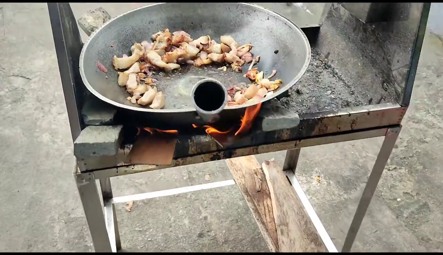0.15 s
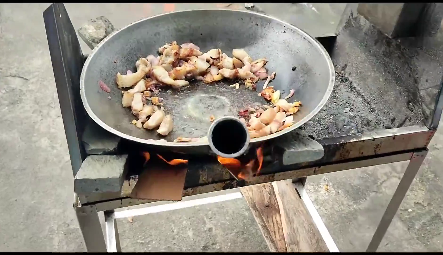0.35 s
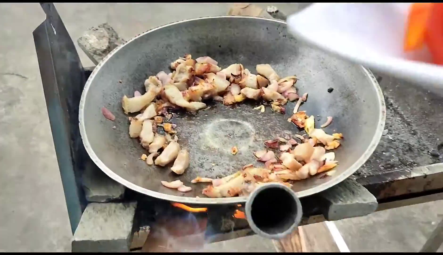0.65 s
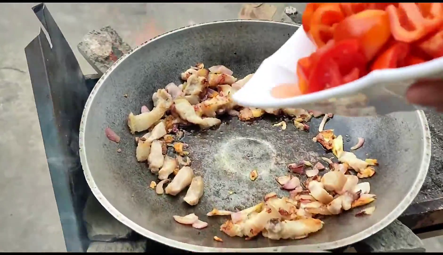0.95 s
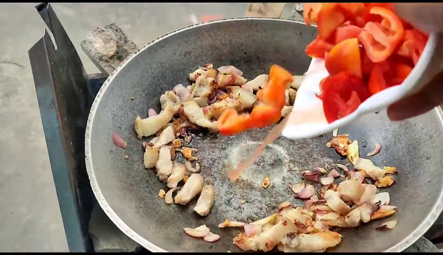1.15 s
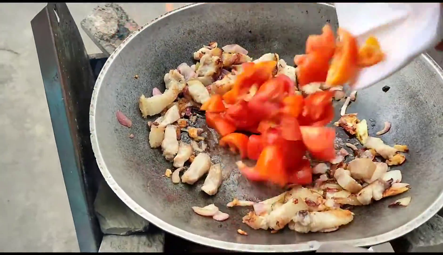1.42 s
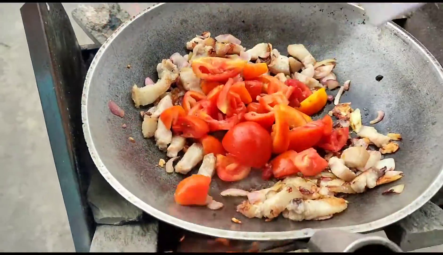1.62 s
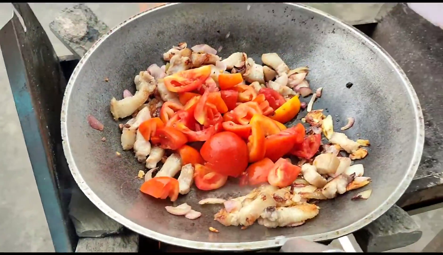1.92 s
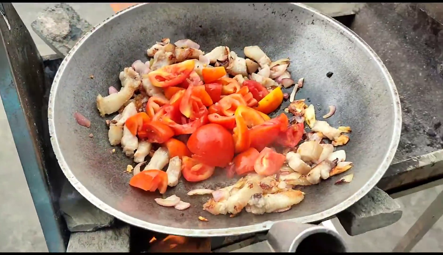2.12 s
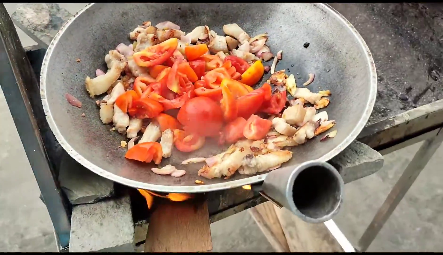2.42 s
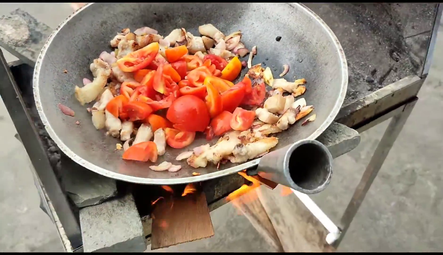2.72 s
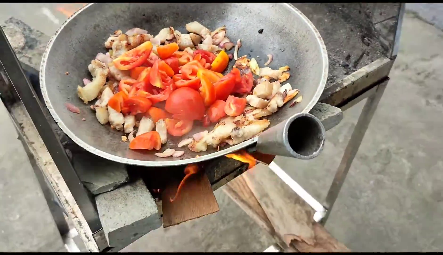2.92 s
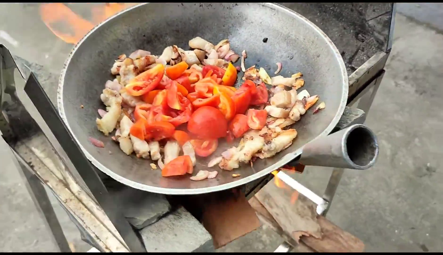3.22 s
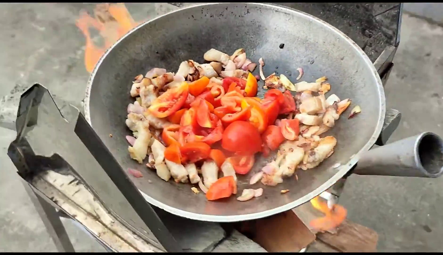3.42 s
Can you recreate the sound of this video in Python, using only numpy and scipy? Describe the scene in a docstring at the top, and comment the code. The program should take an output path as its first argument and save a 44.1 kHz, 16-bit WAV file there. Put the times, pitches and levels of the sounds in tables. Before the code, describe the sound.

Meat fries in a steel wok over a low fire outdoors, with sparse sizzle, sharp spits and small knocks; tomatoes thud in and a dense loud hiss takes over, close stereo microphone.

```python
"""Pork sizzles in a steel wok outdoors: filtered bubble bursts and steam noise, with single bubbles snapping above.
Fat spits (short noise squirts) and pops (cracks with a spray); a wood fire rumbles as shaped noise.
Tomatoes thud in, ring the wok's modes and swell the hiss; knocks and soft low bumps are heard nearby.
Flicks push on the right microphone port and a low two-tone hum swells near the end.
The camera's limiter ducks peaks above full scale and recovers slowly."""
import sys
import numpy as np
from scipy import signal
from scipy.fft import rfft, irfft, next_fast_len
from scipy.io import wavfile
from scipy.ndimage import uniform_filter1d, minimum_filter1d, map_coordinates

SR = 44100
rng = np.random.default_rng(int(sys.argv[2]) if len(sys.argv) > 2 else 0)


def output_pcm(signal):
    """Save a mono or channel-first signal as 16-bit PCM at the path in sys.argv[1].

    Samples are clipped to [-1, 1] before scaling.
    """
    pcm = np.clip(np.atleast_2d(signal).T, -1, 1) * 32767
    wavfile.write(sys.argv[1], SR, np.round(pcm).astype(np.int16))


N = 156555

# Frying strength. Each row: time in seconds, level in dB, right-over-left lean in dB added to the colour's own.
FRYING_LEVELS = [(0, -31, 3), (.35, -28, 3.5), (.6, -30.5, 2.5), (.85, -28.5, 4.5), (1.05, -33.5, 0.5),
                 (1.28, -28, -1.5), (1.3, -21, -4.5), (1.36, -13, 6.5), (1.47, -14.5, -2.5),
                 (1.53, -9, -0.5), (1.6, -11, -2), (1.79, -14.5, -3), (1.86, -7.5, -1), (1.92, -12, 1),
                 (2.12, -10, -1), (2.23, -12.5, 3.5), (2.32, -12, 0.5), (2.42, -14.5, 3.5), (2.48, -8, 3.5),
                 (2.52, -15, 5.5), (2.57, -10, -2), (2.72, -16.5, 3), (3.2, -14.5, 1.5), (3.55, -15.5, 1.5)]
# Frying colour at the ports. Each row: frequency in Hz, left gain in dB, right gain in dB.
SIZZLE_COLOUR = [(100, -21.5, -26), (300, -29.5, -31), (454, -33, -37), (597, -14, -18), (780, -20, -23),
                 (1520, -12.5, -18), (3240, -7.5, -9), (4520, -9.5, -6), (6040, -9, -2), (7200, -4, 2),
                 (7816, -10, 1), (8190, -4.5, -13.5), (9300, -8, -10.5), (9700, -16, -9),
                 (13150, -8.5, -11.5), (15200, -11.5, -16.5)]
# Fat alone against wet frying. Each row: frequency in Hz, gain in dB.
FAT_COLOUR = [(700, 0.5), (2200, -2), (6000, -1), (8500, -0.5), (13000, 0)]
# Likeness of the ports. Each row: frequency in Hz, left-right correlation (0 to 1).
PORT_LIKENESS = [(60, 0.82), (150, 0.99), (400, 0.76), (1000, 0.8), (2400, 0.57), (6000, 0.014)]
JUICE_S = 1.3  # the tomatoes reach the hot steel
BUBBLES_PER_S, BUBBLE_SPREAD_DB, STEAM_DB = 2600, 4, 0.5
# Fat alone bursts less often, and its level swings are a little gentler
FAT_BUBBLE_SHARE, FAT_SWING_SHARE = 0.3, 0.81
FLURRY_DB, FLUTTER_DB, SWELL_DB = 0.32, 1.5, 0.8  # fast, medium and slow level swings in wet frying

# Single bubbles, oil then juice. Each row: start in seconds, end in seconds, count per second,
# top level in dB over the frying, middle pitch in Hz, cycles to decay to 1/e.
BUBBLE_TICKS = [(0, JUICE_S, 120, 20, 6900, 2.2), (JUICE_S, 3.54, 380, 12.1, 6350, 3.6)]
TICK_RANGE_DB, TICK_LEFT_DB, TICK_SPREAD_OCT = 16, -4, 0.6

# Flames and yard. Each row: time in seconds, level in dB.
FIRE_LEVELS = [(0, -34), (.25, -30.5), (.5, -34), (.8, -34), (1.3, -36), (1.7, -37), (2.4, -36), (3.0, -37),
               (3.17, -29), (3.55, -31.5)]
# Rumble colour. Each row: frequency in Hz, gain in dB.
RUMBLE_COLOUR = [(20, -1.5), (45, -2), (70, 4.5), (100, -2.5), (145, 3), (200, -12), (320, -8),
                 (480, -15.5), (1000, -21.5), (3000, -36)]

# Steam squirts from the fat. Each row: start in seconds, level in dB before colouring, decay to 1/e in seconds.
FAT_SPITS = [(0.033, -6, 0.0043), (0.04, -6.5, 0.0017), (0.151, -11, 0.0017), (.241, -15, 0.0014),
             (0.159, -15, 0.0009), (0.306, -14, .0015), (0.429, -7, 0.00093), (0.435, -14, 0.0043),
             (0.5124, -2, 0.0016), (0.615, -11, 0.00091), (0.624, -10, .002), (.629, -3, 0.0029),
             (0.6896, -3.5, 0.0015), (0.754, -12, .004), (0.766, -13, 0.0048), (0.781, -7, 0.0016),
             (.893, -14, .0015), (1.154, -8, 0.0018), (1.194, -11, 0.0031), (1.295, -8.5, 0.0043),
             (1.328, 1.5, 0.0042), (2.122, -6, 0.0035), (2.2, -16, 0.0015)]
SPIT_HZ, SPIT_WIDTH_HZ, SPIT_RING_GAIN = 8200, 2900, 2.76
SPIT_LEFT_DB, SPIT_ATTACK_S = -4.5, 0.00038
STRAY_SPITS_PER_S, STRAY_SPIT_DB = 16, -5  # top level over the frying

# Knocks nearby. Each row: start in seconds, level in dB, brightness in dB per octave.
KNOCK_BLOWS = [(.086, -34.5, 7), (.3415, -22, 0), (.351, -29, 6), (.367, -32, 0), (.401, -28, -8),
               (.526, -30, -4)]
# Modes of the knocked object. Each row: frequency in Hz, level in dB, 60 dB decay in seconds.
KNOCK_MODES = [(730, 5.5, 0.057), (833, -2.5, 0.047), (970, -0.5, 0.06), (1085, 0, 0.068), (1380, -8, 0.06)]
# Line width added by loose, rattling contact
WOK_BLUR_HZ, KNOCK_BLUR_HZ = 2.6, 22

# Soft low bumps of air. Each row: centre in seconds, level in dB, pitch in Hz, half-width to 1/e in seconds.
AIR_BUMPS = [(0.462, -24.5, 93, 0.014), (1.374, -24, 65, 0.014), (2.672, -20.5, 165, 0.0069)]

# Water drops bursting in the fat. Each row: start in seconds, relative level in dB.
WATER_POPS = [(0.489, 13), (0.5543, 0), (0.7521, -4), (.863, 6.5), (.865, 4), (.9969, 7.5), (1.1771, 4),
              (1.3981, 14.5), (1.474, 8.5), (2.4275, -2), (2.5665, 5.5)]
# Pop colour. Each row: frequency in Hz, gain in dB.
POP_SPECTRUM = [(150, -9), (700, -8), (2500, -7.5), (5500, 0.5), (7500, 2.5), (9500, -3), (14000, -3)]
POP_TAIL_DB, POP_TAIL_T60_S = -14, 0.013
POP_LAG_S = 0.00004  # a pop reaches the right port a little later

# Tomato pieces landing. Each row: start in seconds, level in dB, brightness in dB per octave.
TOMATO_LANDINGS = [(1.304, -21.5, 3), (1.322, -22.5, -5), (1.3326, -15.5, -2), (1.363, -35, -1),
                   (1.473, -21, -1.5), (1.501, -25, -8)]
# Modes of the loaded wok. Each row: frequency in Hz, level in dB, 60 dB decay in seconds.
WOK_MODES = [(215, -13, 0.11), (325, -7.5, 0.083), (460, -0.5, 0.035), (565, -2, 0.08), (643, -1, 0.048),
             (1259.6, 0, 0.15), (1630, -1.5, 0.064), (1940, -15, 0.1)]
THUD_T60_S, THUD_HZ = 0.043, 600
YARD_DB, YARD_T60_S = -11.5, 0.48

# Flicks on the right port. Each row: start in seconds, pressure step re full scale before smoothing,
# step decay to 1/e in seconds, tick re full scale. All before the limiter.
PORT_FLICKS = [(2.5816, -2.1, 0.029, 5.5), (2.667, 0.52, 0.01, 0), (2.689, 0.29, 0.017, 0.5)]
FLICK_HZ, FLICK_RING_HZ, FLICK_TICK_T60_S = 220, 620, 0.002
PUFF_S, PUFF_WIDTH_S, PUFF_DB = 2.75, 0.12, -8  # slow push of air on that port

# Hum strength. Each row: time in seconds, level in dB.
HUM_LEVELS = [(0, -56), (2.85, -51.5), (3.08, -37), (3.2, -36), (3.55, -33)]
HUM_HZ, OCTAVE_DB, HUM_WAVER = 156.5, -8.5, 0.0498  # waver as a fraction of pitch

TOP_HZ = 14350
CEILING_DB, RELEASE_DB_PER_S, HOLD_S = 0, 119, 0.005


def amp(db):
    """dB to amplitude factor."""
    return 10 ** (np.asarray(db) / 20)


def unit(x):
    """Scale to an RMS of 1 over all samples and ports."""
    return x / np.sqrt(np.mean(x ** 2) + 1e-20)


def along(points, hz):
    """Columns of (Hz, value, ..) points on a log axis."""
    f, *cols = np.transpose(points)
    return np.array([np.interp(np.log(hz + 1), np.log(f + 1), c) for c in cols])


def curves(rows):
    """One value per sample for each column after the time."""
    s, *cols = np.transpose(rows)
    return [np.interp(np.arange(N) / SR, s, c) for c in cols]


def wobble(rate):
    """Smooth random curve, rate knots per second."""
    knots = rng.standard_normal(int(N * rate / SR) + 4)
    return map_coordinates(knots, [np.arange(N) * rate / SR])


def filtered(x, response):
    """Apply a response given as a function of Hz."""
    m = 2 * next_fast_len(N // 2 + SR // 4)
    return irfft(rfft(x, m) * response(np.fft.rfftfreq(m, 1 / SR)), m)[..., :N]


def causal(gain):
    """Minimum-phase response with this gain, by folding the cepstrum."""
    c = irfft(np.log(gain + 1e-6))
    half = c.shape[-1] // 2
    c[..., 1:half] *= 2
    c[..., half + 1:] = 0
    return np.exp(rfft(c))


def add(track, s, sound):
    """Mix a sound in at time s."""
    part = track[..., max(round(s * SR), 0):][..., :sound.shape[-1]]
    part += sound[..., :part.shape[-1]]


def spread(pair):
    """Two unrelated signals become left and right: alike in the bass, unrelated in the treble."""
    def mid_side(hz):
        turn = np.arccos(np.clip(along(PORT_LIKENESS, hz)[0], -1, 1)) / 2
        return np.array([np.cos(turn), np.sin(turn)])

    mid, side = filtered(pair, mid_side)
    return np.array([mid + side, mid - side])


def sizzle():
    """Tiny bubbles burst in flurries over a bed of steam; juice makes them denser and recolours them."""
    level_db, lean_db = curves(FRYING_LEVELS)
    dry = np.arange(N) / SR < JUICE_S
    share = np.where(dry, FAT_BUBBLE_SHARE, 1)
    happens = rng.random((2, N)) < share * BUBBLES_PER_S / SR
    bursts = happens * rng.choice([-1, 1], (2, N)) / np.sqrt(share)
    size_db = BUBBLE_SPREAD_DB * np.minimum(rng.standard_normal((2, N)), 2.8)
    bubbles = unit(bursts * amp(size_db))
    source = spread(bubbles + amp(STEAM_DB) * rng.standard_normal((2, N)))

    flutter = np.array([wobble(50), wobble(50)])
    swings = amp(FLURRY_DB * wobble(320) + FLUTTER_DB * flutter + SWELL_DB * wobble(16))
    source = source * swings ** np.where(dry, FAT_SWING_SHARE, 1)
    wet = filtered(source, lambda hz: causal(amp(along(SIZZLE_COLOUR, hz))))
    fat = filtered(wet, lambda hz: amp(along(FAT_COLOUR, hz)))
    return np.where(dry, unit(fat), unit(wet)) * amp(level_db + np.outer([-.5, .5], lean_db))


def ticks():
    """Single bubbles snap as decaying sines, each with its own pitch; juice ones are denser and ring longer."""
    level_db, _ = curves(FRYING_LEVELS)
    out, t = np.zeros((2, N)), np.arange(SR // 125) / SR
    for start, end, rate, db, middle_hz, cycles in BUBBLE_TICKS:
        for when, size, a, b, phase in rng.random((int(rate * (end - start)), 5)):
            s = start + when * (end - start)
            hz = middle_hz * 2 ** (TICK_SPREAD_OCT * (a - b))
            turns = hz * t + np.array([[0], [phase]])
            snap = np.exp(-t * hz / cycles) * np.sin(2 * np.pi * turns)
            frying_db = level_db[min(int(s * SR), N - 1)]
            add(out, s, amp(frying_db + db - TICK_RANGE_DB * np.sqrt(size)) * snap)
    return out * amp([[TICK_LEFT_DB], [0]])


def fire():
    """Low, unsteady rumble of the flames and the yard: shaped noise."""
    noise = spread(rng.standard_normal((2, N)))
    roar = unit(filtered(noise, lambda hz: amp(along(RUMBLE_COLOUR, hz))))
    return roar * amp(curves(FIRE_LEVELS)[0] + 2.3 * wobble(9.8))


def spits():
    """Noise squirts with a resonant whistle; stray ones are louder where the frying is louder."""
    level_db, _ = curves(FRYING_LEVELS)
    strays = []
    for when, drop, length in rng.random((int(STRAY_SPITS_PER_S * N / SR), 3)):
        db = level_db[int(when * N)] + STRAY_SPIT_DB - 8 * drop
        strays.append((when * N / SR, db, .001 + 0.0039 * length))

    out, t = np.zeros((2, N)), np.arange(SR // 25) / SR
    for s, db, length in FAT_SPITS + strays:
        squirt = (1 - np.exp(-t / SPIT_ATTACK_S)) * np.exp(-t / length)
        add(out, s, amp(db) * squirt * rng.standard_normal((2, len(t))))

    def colour(hz):
        whistle = 1 + SPIT_RING_GAIN / (1 + (2 * (hz - SPIT_HZ) / SPIT_WIDTH_HZ) ** 2)
        return causal(amp(along(SIZZLE_COLOUR, hz)) * whistle)

    return filtered(out, colour) * amp([[SPIT_LEFT_DB], [0]])


def struck(blows, modes, blur_hz):
    """Each blow rings decaying modes, tilted by its brightness; loose contact jitters their phase."""
    out, t = np.zeros((2, N)), np.arange(SR // 3) / SR
    middle_hz = np.median([hz for hz, _, _ in modes])
    attack = 1 - np.exp(-t / 0.00037)
    for s, db, bright in blows:
        for hz, level, t60 in modes:
            rattle = np.cumsum(rng.standard_normal(len(t))) * np.sqrt(2 * np.pi * blur_hz / SR)
            port_phase = rng.uniform(0, 2 * np.pi) + rng.normal(0, 0.57, (2, 1))
            phase = port_phase + uniform_filter1d(rattle, size=41)
            mode_db = db + level + bright * np.log2(hz / middle_hz) + rng.normal(0, 1)
            add(out, s, amp(mode_db - 60 * t / t60) * attack * np.sin(2 * np.pi * hz * t + phase))
    return out


def knocks():
    """Blows on a nearby object ring its modes."""
    return struck(KNOCK_BLOWS, KNOCK_MODES, KNOCK_BLUR_HZ)


def yard(x):
    """The stove and nearby walls scatter a short decaying noise tail."""
    t = np.arange(SR // 3) / SR
    noise = spread(rng.standard_normal((2, N)))[:, :len(t)]
    tail = noise * amp(-60 * t / YARD_T60_S) * (1 - np.exp(-t / 0.0037))
    return x + amp(YARD_DB) * signal.fftconvolve(x, tail / np.linalg.norm(tail[0]), axes=1)[:, :N]


def bumps():
    """Short low-pressure swings, Gaussian-windowed cosines equal at both ports."""
    t = np.arange(N) / SR
    out = np.zeros(N)
    for s, db, hz, length in AIR_BUMPS:
        swing = np.cos(2 * np.pi * hz * (t - s))
        out += amp(db) * np.exp(-((t - s) / length) ** 2) * swing
    return out


def pops():
    """A bursting drop gives one sharp crack with a brief noise spray behind it."""
    out, t = np.zeros((2, N)), np.arange(SR // 25) / SR
    for s, db in WATER_POPS:
        spray = amp(POP_TAIL_DB - 60 * t / POP_TAIL_T60_S) * rng.standard_normal((2, len(t)))
        add(out, s, amp(db) * ((t == 0) + spray))

    def colour(hz):
        lag = np.exp(-2j * np.pi * np.outer([0, POP_LAG_S], hz))
        return causal(amp(along(POP_SPECTRUM, hz))) * lag

    return 2 * filtered(out, colour)


def tomatoes():
    """Soft pieces thud on the steel (low-passed noise) and ring the loaded wok."""
    thuds, t = np.zeros((2, N)), np.arange(SR // 5) / SR
    for s, db, _ in TOMATO_LANDINGS:
        add(thuds, s, amp(db - 60 * t / THUD_T60_S) * rng.standard_normal((2, len(t))))
    soft = filtered(spread(thuds), lambda hz: 1 / (1 + 1j * hz / THUD_HZ) ** 2)
    return struck(TOMATO_LANDINGS, WOK_MODES, WOK_BLUR_HZ) + 4 * soft


def port_flicks():
    """Touches on the right port: ticks and pressure steps that leak away, then a slow push of air."""
    steps, taps, t = np.zeros(N), np.zeros(N), np.arange(SR // 3) / SR
    for s, step, decay, tick in PORT_FLICKS:
        add(steps, s, step * np.exp(-t / decay))
        add(taps, s, tick * amp(-60 * t / FLICK_TICK_T60_S) * np.cos(2 * np.pi * FLICK_RING_HZ * t))
    smooth = filtered(steps, lambda hz: 1 / (1 + 1j * hz / FLICK_HZ))
    puff = amp(PUFF_DB) * np.exp(-((np.arange(N) / SR - PUFF_S) / PUFF_WIDTH_S) ** 2)
    return np.outer([.02, 1], smooth + taps + puff)


def hum():
    """Low tone and its octave, wavering together in pitch and separately in level."""
    phase = 2 * np.pi * np.cumsum(HUM_HZ * (1 + HUM_WAVER * wobble(30))) / SR
    low = np.sin(phase) * amp(2.4 * wobble(24.94))
    octave = np.sin(2 * phase) * amp(OCTAVE_DB + 1.6 * wobble(24.8))
    return amp(curves(HUM_LEVELS)[0]) * (low + octave)


def scene():
    """Sum of all layers; only the knocks and tomatoes get the yard's tail."""
    pan = sizzle() + ticks() + spits() + pops()
    impacts = yard(knocks() + tomatoes())
    return pan + fire() + impacts + bumps() + port_flicks() + hum()


def record(dry):
    """Band limit; a limiter shared by both ports clamps peaks and recovers slowly; band limit again."""
    band = lambda hz: 1 / (1 + (hz / TOP_HZ) ** 240)
    x = filtered(dry, band)
    over_db = np.maximum(20 * np.log10(np.abs(x).max(0) + 1e-9) - CEILING_DB, 0)
    hold = int(HOLD_S * SR) // 2 * 2 + 1
    held = -minimum_filter1d(-over_db, hold, origin=hold // 2)
    # A running maximum on a ramp gives instant attack and linear-dB release
    ramp = RELEASE_DB_PER_S * np.arange(N) / SR
    gain_db = ramp - np.maximum.accumulate(held + ramp)
    gain_db = uniform_filter1d(minimum_filter1d(gain_db, size=41), size=41)
    return filtered(x * amp(gain_db), band)


dry = scene()
out = record(dry)
output_pcm(out)
```